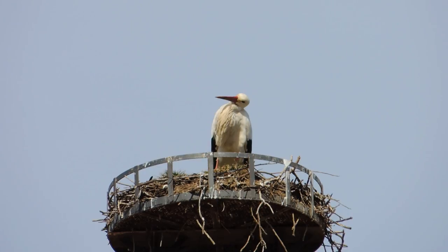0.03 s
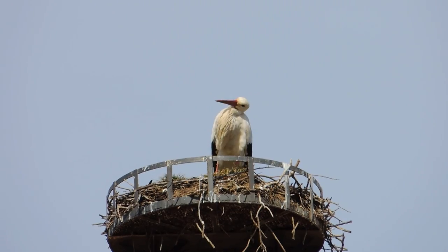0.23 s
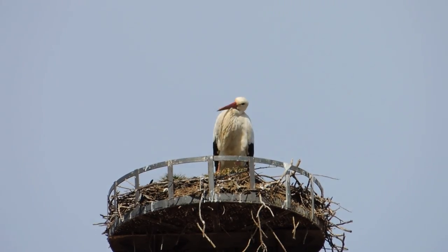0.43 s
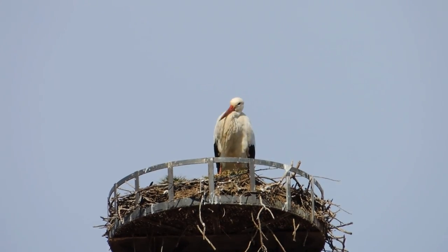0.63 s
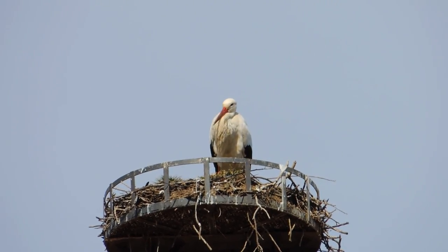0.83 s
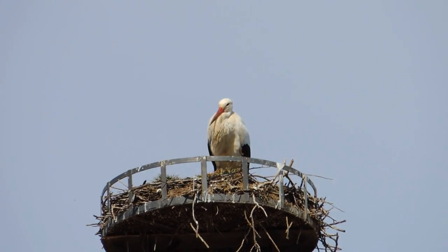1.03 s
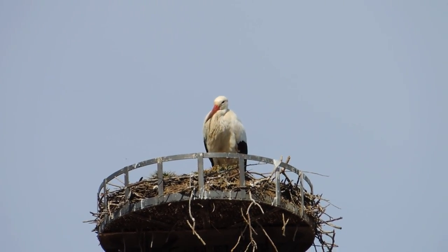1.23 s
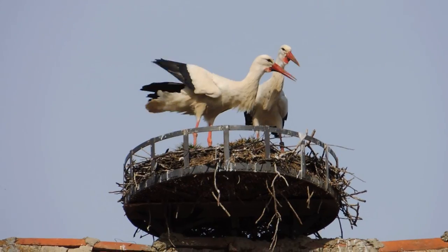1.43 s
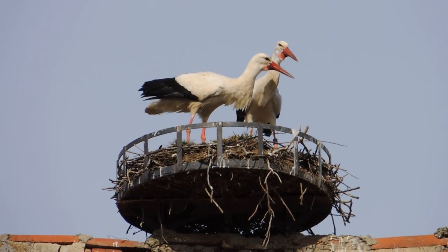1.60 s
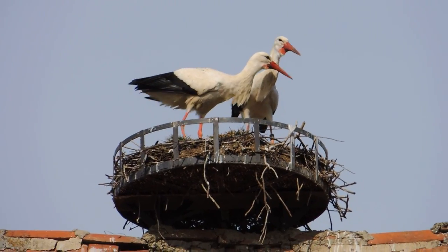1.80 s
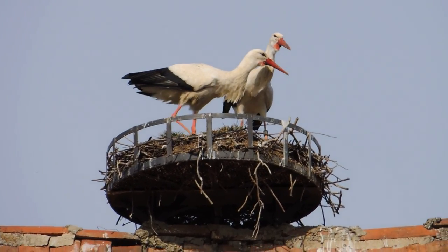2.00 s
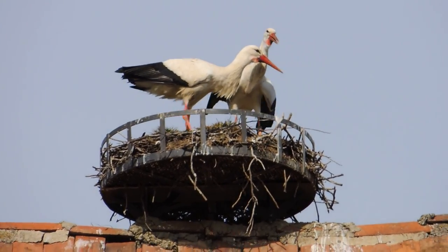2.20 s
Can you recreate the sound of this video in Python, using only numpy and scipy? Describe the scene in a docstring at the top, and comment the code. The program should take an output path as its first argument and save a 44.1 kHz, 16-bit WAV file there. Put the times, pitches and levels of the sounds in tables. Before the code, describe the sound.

Stork bills clacking rapidly outdoors, following a gusty rumble of wind on the microphone.

```python
"""A gusty rumble comes first: wind buffets the two ports of a microphone below a stork nest. The sound drops
out briefly and the scene changes: in calmer air two storks clatter, each at its own pace: the mandibles touch,
slam shut and excite the damped modes of the bill and the throat pouch. One dry scrape sounds close to the
microphone; a steady hiss lies under wind and clatter alike."""
import sys
import numpy as np
from scipy import signal
from scipy.fft import rfft, irfft
from scipy.io import wavfile
from scipy.ndimage import uniform_filter1d

SR = 44100
rng = np.random.default_rng(int(sys.argv[2]) if len(sys.argv) > 2 else 0)


def to_wav(s):
    """Save 16-bit WAV."""
    ch = np.atleast_2d(s).T  # columns
    pcm = np.round(np.clip(ch, -1, 1) * 32767)  # PCM
    wavfile.write(sys.argv[1], SR, pcm.astype(np.int16))


N = 103635


def undb(db):
    return 10 ** (np.asarray(db) / 20)


def seconds():
    return np.arange(N) / SR


def pan(db):
    """Constant-power panning: left and right gains for a level difference, left minus right."""
    gains = undb(np.array([np.atleast_1d(db), -np.atleast_1d(db)]) / 2)
    return gains / np.sqrt(np.mean(gains ** 2, axis=0))


def unit_rms(x):
    return x / np.sqrt(np.mean(x ** 2))


def at_hz(points, hz):
    """Interpolation of (f/Hz, level/dB) points on a logarithmic frequency axis."""
    f, db = np.array(points).T
    return np.interp(np.log(np.maximum(hz, 1)), np.log(f), db)


def butter(x, hz, kind, order=2):
    return signal.sosfilt(signal.butter(order, hz, kind, fs=SR, output="sos"), x)


def decay(t, t60):
    return np.exp(-np.log(1000) * t / t60)


def ring(t, hz, db, t60, rise_s):
    """Damped oscillator struck at t = 0, building up over the contact; db is its gain at resonance."""
    age = np.maximum(t, 0)
    amplitude = undb(db) * 2 * np.log(1000) / (t60 * SR)
    return amplitude * (1 - np.exp(-age / rise_s)) * decay(age, t60) * np.cos(2 * np.pi * hz * age)


def reverberation(x, db, t60, size=16384):
    """Diffuse field: convolution with exponentially decaying noise, independent in each channel."""
    tail = rng.standard_normal((2, size)) * decay(np.arange(size) / SR, t60)
    return undb(db) * signal.fftconvolve(x, unit_rms(tail) / np.sqrt(size), axes=1)[:, :N]


def air(windy, db):
    """Partial coherence: distant outdoor noise, partly common to both ports, merges into unrelated hiss."""
    # background spectra in wind and in calm: f/Hz, relative spectral level/dB
    windy_spectrum = [(30, -35), (200, -2), (600, -14), (1100, -15), (2000, -20), (4000, -23.5),
                      (8000, -25.5), (14000, -26.5)]
    calm_spectrum = [(30, 7), (200, 1), (350, -8.5), (650, -6.5), (1200, -10), (2000, -13.5), (4000, -16.5),
                     (8000, -18), (14000, -20.5)]
    f = np.arange(N // 2 + 1) * SR / N
    noise = rfft(rng.standard_normal((3, N)))
    shared = 0.55 / (1 + (f / 1710) ** 2)  # fraction of the power
    mixed = np.sqrt(1 - shared) * noise[:2] + np.sqrt(shared) * noise[2]
    colour = undb(at_hz(windy_spectrum if windy else calm_spectrum, f))
    return undb(db) * unit_rms(irfft(mixed * colour, N))


def turbulence(db, edge_hz, pan_db):
    """Turbulent pressure, uncorrelated at the two ports: each surge is louder and reaches higher."""
    low_hz, knee_hz, flutter_hz, edge_order = 22, 119, 38, 4.46
    flutter = unit_rms(butter(rng.standard_normal((2, N)), flutter_hz, "low"))
    edge = edge_hz * np.exp(0.2 * flutter)
    f = np.arange(N // 2 + 1) * SR / N
    noise = rfft(rng.standard_normal((2, N)))
    rumble, power = 0, 0
    for hz in 16 * 2 ** (np.arange(14) / 2):  # half-octave bands
        band = unit_rms(irfft(noise * (np.abs(np.log2((f + 1) / hz)) < 1 / 4), N))
        band_power = hz / (1 + (low_hz / hz) ** 2) / (1 + (hz / knee_hz) ** 2)
        band_power /= 1 + (hz / edge) ** (2 * edge_order)
        rumble += np.sqrt(band_power) * band
        power += band_power
    return rumble / np.sqrt(power) * undb(db + 0.96 * (flutter - 0.5)) * pan(pan_db)


def breeze():
    """Weak turbulence: a faint low rumble under the clatter."""
    # strength of the breeze: t/s, level/dB
    envelope = [(1.38, -57), (1.6, -55.5), (1.88, -57.5), (1.991, -37), (2.12, -42.5), (2.2, -48.5),
                (2.28, -43.5), (2.35, -63)]
    return turbulence(np.interp(seconds(), *np.array(envelope).T), edge_hz=84, pan_db=-11.5)


def gusts():
    """Wind noise: turbulence swells twice, and single eddies push and pull at the ports."""
    # wind at the ports: t/s, level/dB, upper edge f/Hz, left minus right/dB
    swells = [(0, -42.5, 114, 4.5), (.135, -33, 134, 5), (.175, -41.5, 129, -6), (0.322, -24, 150.4, -6),
              (.36, -34, 136, 2), (0.439, -25, 242, 2), (.55, -29, 260, 9.5), (.645, -26, 242, -5),
              (.79, -33.5, 157, 0.5), (.84, -28.5, 196, -10.5), (.99, -25, 178, -4), (1.04, -33, 244, -5),
              (1.10, -23.5, 273, -1.5), (1.145, -30, 227, -2), (1.19, -30, 306, 2.5), (1.28, -29, 231, 14),
              (1.339, -26.5, 330, -2.5)]
    # single eddies: t/s, level/dB, f/Hz, left minus right/dB
    eddies = [(.427, -21, 337, 11), (0.497, -11.5, 106, 15), (.497, -18.5, 340, 31), (.532, -20, 347, 25),
              (.448, -20.5, 149, 0), (.565, -14.5, 127, 16), (.935, -23, 320, -21), (1.032, -12, 94, -32),
              (1.039, -23, 332, 4), (1.088, -22.5, 200, -1), (1.117, -22.5, 333, -5),
              (1.122, -10.5, 120, -18), (1.158, -20, 366, 26), (1.179, -22.5, 386, 14),
              (1.208, -17.5, 220.8, 15), (1.259, -14, 119, 26), (1.326, -18.5, 215, 17)]
    t = seconds()
    times, *columns = np.array(swells).T
    wind = turbulence(*(np.interp(t, times, column) for column in columns))
    for when, db, hz, pan_db in eddies:
        cycles = (t - when) * hz
        window = np.exp(-(cycles / 0.34) ** 2 / 2)  # leaves about one push and one pull
        wind += undb(db) * pan(pan_db) / np.sqrt(2) * np.sin(-2 * np.pi * cycles) * window
    return wind


def thump(when, db=-34, decay_s=0.089):
    """Exponential relaxation: a level that sinks from t = when, heard as a soft thump when gated on."""
    return undb(db) * np.exp(-np.maximum(seconds() - when, 0) / decay_s)


def scrape(size=4096):
    """Friction: something dry catches twice, and bursts of tiny uneven clicks ring a hard body."""
    # catches: t/s, relative level/dB, Gaussian width/s, left minus right/dB
    catches = [(2.0451, -27.5, 0.0014, -4.5), (2.0505, -26, .0016, -4)]
    # modes of the body: f/Hz, relative gain at resonance/dB, T60/s, left minus right/dB
    modes = [(850, -0.5, .014, 3), (1265, 2.5, .012, 12), (1534, 3.5, 0.0079, 6), (2310, 8.5, 0.0073, 10),
             (3190, 1.5, 0.0066, -1.5), (3930, -0.5, 0.0052, 4), (5160, -0.5, 0.012, 22),
             (7800, -15, 0.0046, -13), (10440, -9, 0.0035, -23), (11470, -6, .005, -10)]
    t = seconds()
    force = sum(undb(db) * pan(pan_db) * np.exp(-((t - when) / width) ** 2 / 2)
                for when, db, width, pan_db in catches)
    grit = unit_rms(rng.standard_normal((2, N)) * undb(3.5 * rng.standard_normal(N)))
    body = sum(pan(pan_db) * ring(t[:size], hz, db, t60, rise_s=0.00007)
               for hz, db, t60, pan_db in modes)
    direct = undb(8.5) * signal.fftconvolve(force * grit, body, axes=1)[:, :N]
    return direct + reverberation(butter(direct, 4000, "low"), db=-3, t60=0.059)


def stork(clacks, bill, rise_s, size=4096):
    """Modal superposition: a touch and a slam ring the bill and throat pouch, never quite alike."""
    # level difference of a clack between the ports: f/Hz, left minus right/dB
    balance = [(500, -1), (1000, 1.5), (1750, 5.5), (2600, -3.5), (3300, -1.5), (4200, 3), (6000, -10)]
    left_lag_s, pouch_t60_s = 0.00004, 0.022
    clatter = np.zeros((2, N + size))
    for when, db, pouch_hz, pouch_db, lead, touch in clacks:
        start = int((when - 2 * lead) * SR)
        t = (start + np.arange(size)) / SR - when - np.array([[left_lag_s], [0]])
        for hz, mode_db, t60 in list(bill) + [(pouch_hz, pouch_db, pouch_t60_s)]:
            detune, scatter_db = rng.standard_normal(2) * (0.006, 0.9)
            mode = hz * (1 + detune), db + mode_db + scatter_db, t60, rise_s
            clack = ring(t, *mode) + touch * ring(t + lead, *mode)
            clatter[:, start:start + size] += pan(at_hz(balance, hz)) * clack
    return butter(butter(clatter[:, :N], 350, "high", order=4), 5560, "low", order=3)


def nest():
    """Direct and reflected sound: a quicker and a slower stork clatter, and roof and yard reverberate."""
    # clacks: t/s, level/dB, pouch f/Hz, pouch gain/dB, lead of touch/s, signed ratio of touch to slam
    quick_clacks = [(1.5445, -1.5, 600, 2.5, .0011, -0.18), (1.6552, -2.5, 580, 5, 0.00091, -0.11),
                    (1.7622, -1.5, 553, 1, 0.0011, -0.2), (1.8738, -2, 570, 4, .001, -0.13),
                    (1.9871, -3, 554, 4, 0.00083, -0.21), (2.0999, -2, 530, 1, 0.00103, -0.25),
                    (2.2136, -1.5, 544, 2.5, 0.0011, -0.21), (2.3238, -4, 560, 5.5, 0.0008, -0.3)]
    slow_clacks = [(1.4311, 1.5, 707, 6, 0.00129, 0.52), (1.5562, -0.5, 640, 3.5, 0.0012, 0.28),
                   (1.6844, -1, 610, 0, 0.0011, 0.5), (1.8135, -0.5, 630, 4, 0.0012, 0.41),
                   (1.9410, -1.5, 617, 2, .0012, 0.44), (2.0700, -0.5, 624, 0.5, 0.0012, 0.45),
                   (2.1994, -1.5, 610, 3.5, 0.0012, 0.87), (2.3299, -4, 590, 6, 0.0011, .5)]
    # modes of each bill: f/Hz, gain at resonance/dB, T60/s
    quick_bill = [(510, -3, 0.0062), (715, 3.5, 0.026), (1130, -4.5, 0.03), (1694, 2, 0.012),
                  (1832, 7.5, 0.015), (2000, -15, 0.016), (2537, 7, 0.02), (3110, -11, 0.01),
                  (3330, -14, .013), (3990, -3.5, 0.025), (4080, -22, .009), (5500, -6.5, 0.027)]
    slow_bill = [(488, 6, .022), (758, -5.5, 0.032), (978, -8, 0.0091), (1700, -2, 0.019),
                 (1836, -4, 0.018), (2003, 6, 0.017), (2517, -4.5, 0.013), (2614, -3.5, 0.015),
                 (3386, -3.5, 0.017), (4220, -10.5, .011), (5100, -45, .006)]
    quick = stork(quick_clacks, quick_bill, rise_s=0.0001)
    slow = stork(slow_clacks, slow_bill, rise_s=0.00017)
    direct = quick + slow
    roof = reverberation(direct, db=-10.5, t60=0.037)
    yard = reverberation(direct, db=-15.5, t60=0.17)
    return direct + roof + yard


def scene():
    """Superposition and gating: wind, a short silence, then a soft thump and the clattering pair."""
    wind_end_s, calm_start_s = 1.342, 1.3755
    t = seconds()
    storks = nest()
    windy = gusts() + air(windy=True, db=-51.5)
    calm = storks + scrape() + breeze() + air(windy=False, db=-50) + thump(calm_start_s)
    wind_gate = uniform_filter1d(1. * (t < wind_end_s), size=64)
    return windy * wind_gate + calm * (t > calm_start_s)


def record(dry):
    """Band limiting: a steep elliptic low-pass removes the treble above 14.3 kHz."""
    return signal.sosfilt(signal.ellip(10, .2, 70, 14300, fs=SR, output="sos"), dry)


dry = scene()
out = record(dry)
to_wav(out)
```